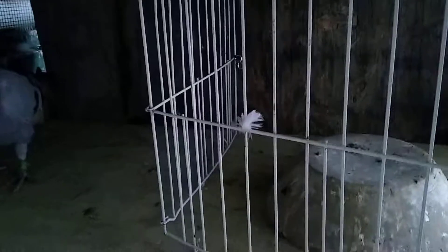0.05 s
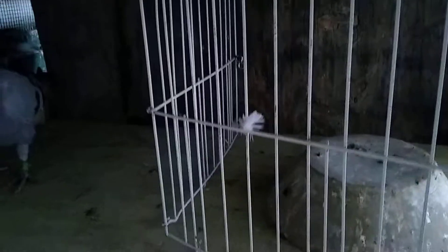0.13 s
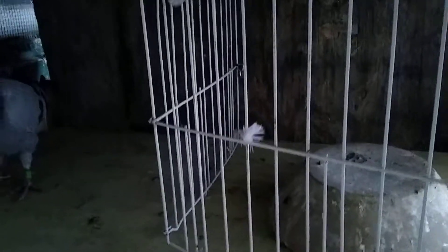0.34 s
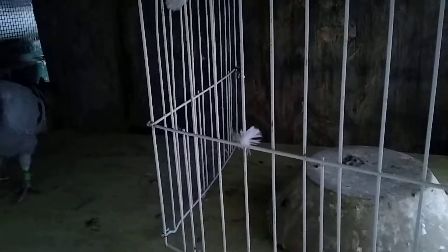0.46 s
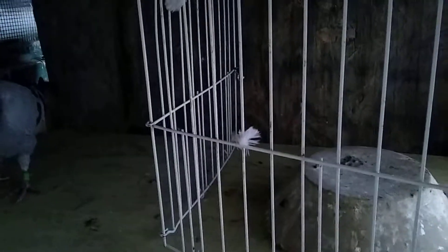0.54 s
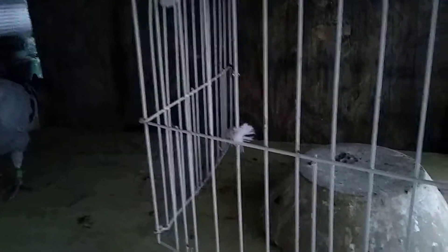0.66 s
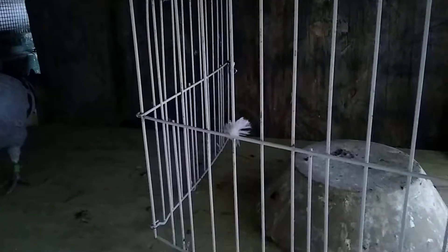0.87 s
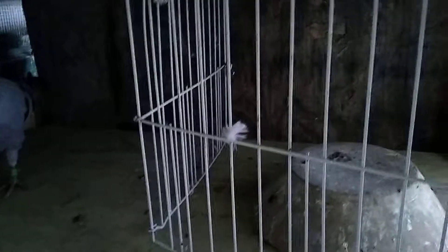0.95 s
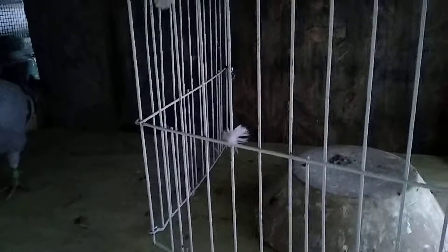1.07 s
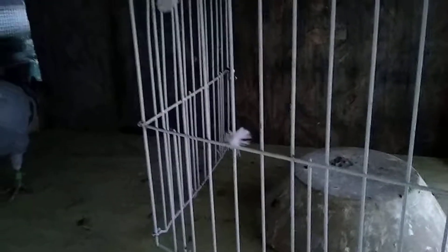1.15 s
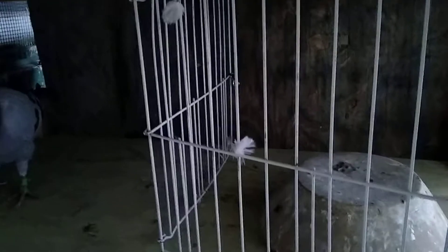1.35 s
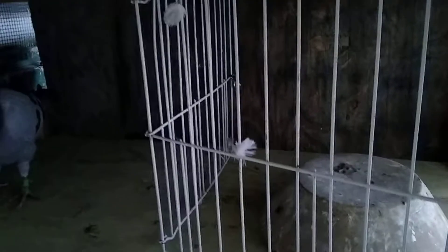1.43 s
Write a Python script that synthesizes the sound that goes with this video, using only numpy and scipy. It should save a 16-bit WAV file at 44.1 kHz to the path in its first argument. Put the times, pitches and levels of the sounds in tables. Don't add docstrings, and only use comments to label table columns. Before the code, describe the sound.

A nearby pigeon gives a short note, a long rolling coo and a closing note in a boxy wooden loft, while other birds murmur, rustle, flap and shuffle faintly; close stereo microphone with soft hiss.

```python
import sys
import numpy as np
from scipy import signal
from scipy.fft import rfft, irfft, next_fast_len
from scipy.io import wavfile
from scipy.ndimage import uniform_filter1d, map_coordinates

SR = 44100
rng = np.random.default_rng(int(sys.argv[2]) if len(sys.argv) > 2 else 0)


def store_wav(level_fs):
    pcm = np.round(np.clip(np.atleast_2d(level_fs), -1, 1) * 32767)
    wavfile.write(sys.argv[1], SR, pcm.T.astype(np.int16))


def gain_from_db(level_db):
    decades = np.asarray(level_db, float) / 20
    return 10 ** decades


N = 66150


def unit(x):
    return x / np.sqrt(np.mean(x ** 2) + 1e-20)


def along(points, hz):
    f, v = np.transpose(points)
    return np.interp(np.log(hz + 1), np.log(f + 1), v)


def curves(rows):
    s, *cols = np.transpose(rows)
    return [np.interp(np.arange(N) / SR, s, c) for c in cols]


def wobble(rate_hz):
    return map_coordinates(rng.standard_normal(400), [np.arange(N) * rate_hz / SR])


def filtered(x, response):
    m = next_fast_len(N + SR // 2)
    return irfft(rfft(x, m) * response(np.fft.rfftfreq(m, 1 / SR)), m)[..., :N]


def delay(hz, late_us):
    return np.exp(-2j * np.pi * hz * np.array(late_us)[:, None] / 10 ** 6)


# (frequency [Hz], correlation [-1..1])
PORT_LIKENESS = [(30, .9995), (80, .996), (160, 0.89), (300, 0.95), (500, 0.6), (900, 0.59), (2000, -0.23),
                 (10000, -0.46)]


def rush(spectrum, patchy_db):
    z = signal.stft(rng.standard_normal((2, N)), nperseg=512)[2]
    field = uniform_filter1d(rng.standard_normal(z.shape[1:]), size=6, axis=0)
    field = uniform_filter1d(field, size=8, axis=1)
    pair = signal.istft(z * gain_from_db(patchy_db * unit(field)), nperseg=512)[1][:, :N]

    def shape(hz):
        turn = np.arccos(np.clip(along(PORT_LIKENESS, hz), -1, 1)) / 2
        return gain_from_db(along(spectrum, hz)) * [np.cos(turn), np.sin(turn)]

    mid, side = filtered(pair, shape)
    return unit(np.array([mid + side, mid - side]))


BOX_HZ = [261, 295, 341, 380, 409, 451, 481, 503, 545, 588]
# (width [Hz], front level [dB], rear level [dB], front phase [turns], rear phase [turns])
BOX_MODES = [(12, -4, -2.5, 0, 0), (11, 6.5, 7, .12, .12), (14, -1, 0, 0, .03), (11, 0, .5, .25, .19),
             (12, 6, 6.5, .4, .44), (12, -2, -2, .2, .26), (11, 2, 1.5, .5, .44), (12, -5, -5.5, .3, .26),
             (22, -11, -10, .1, .14), (16, 0, -1, .4, .37)]


def boxes(f, tilt=0):
    total = 0
    for center, (width, front_db, rear_db, front_turn, rear_turn) in zip(BOX_HZ, BOX_MODES):
        gain = gain_from_db([[front_db], [rear_db]]) * (center / 400) ** tilt
        phase = np.exp(2j * np.pi * np.array([[front_turn], [rear_turn]]))
        mode = 1j * f * width / (center * center - f * f + 1j * f * width)
        total = total + gain * phase * mode
    return total


# (frequency [Hz], density [dB per Hz])
AIR_SPECTRUM = [(15, 3), (40, 8.5), (90, 7.5), (170, 0), (400, -0.5), (800, -16.5), (1700, -23),
                (3000, -43)]


def air():
    rumble = gain_from_db(-44) * rush(AIR_SPECTRUM, patchy_db=2.0)
    hiss = gain_from_db(-63.5) * rush([(500, 6), (5000, 2.0), (14000, -11.5)], patchy_db=5.5)
    return rumble + hiss


# (time [s], level [dB])
MURMUR_LEVEL = [(0, -39), (.07, -45), (.15, -45), (.8, -42), (1.17, -44), (1.3, -53.5), (1.44, -57.5),
                (1.5, -44)]


def murmur():
    voices = rush([(200, 27.8), (600, 0.5)], patchy_db=3.5)
    ringing = unit(filtered(voices, lambda hz: boxes(hz, tilt=2.62)))
    return ringing * gain_from_db(curves(MURMUR_LEVEL)[0] + wobble(9.76))


# (time [s], level [dB])
RUSTLE_LEVEL = [(0.0, -103), (0.178, -65.5), (0.32, -55.5), (0.53, -55.5), (0.646, -53), (0.792, -58.5),
                (1.048, -98.5), (1.26, -64.5), (1.386, -68.5), (1.5, -62)]
# (frequency [Hz], density [dB per Hz])
FEATHER_SPECTRUM = [(500, -41.5), (1200, 1), (2700, 2), (5000, 3.5), (9000, -1), (12000, -2.5),
                    (14500, -8.5)]


def rustle():
    return gain_from_db(curves(RUSTLE_LEVEL)[0] + 0.44 * wobble(13.0)) * rush(FEATHER_SPECTRUM, patchy_db=1.0)


# (time [s], level [dB])
SHUFFLE_LEVEL = [(1.08, -89), (1.16, -62), (1.27, -55), (1.39, -50), (1.44, -55), (1.5, -68)]
# (frequency [Hz], density [dB per Hz])
BOARD_SPECTRUM = [(300, -24.5), (550, -4), (800, 0.5), (1100, -5), (1600, -6), (2300, -2.5), (3200, -18),
                  (5000, -59)]


def feet():
    return gain_from_db(curves(SHUFFLE_LEVEL)[0] + 1.3 * wobble(20)) * rush(BOARD_SPECTRUM, patchy_db=1)


# (time [s], hold [s], level [dB])
WING_BEATS = [
    (0.127, 0.11, -57.5),
    (.512, 0.04, -49),
    (0.757, 0.013, -61),
    (1.031, 0.02, -64),
    (1.201, 0.018, -54.5),
    (1.335, .04, -55),
    (1.5, 0.09, -64.5),
]
# (frequency [Hz], density [dB per Hz])
WING_SPECTRUM = [(400, -28), (1000, 8), (2000, 6), (3500, 4), (7000, -3.5), (11000, -0.5), (14500, -17)]


def wings():
    rise_s, fall_s = 0.0046, 0.062
    t, beats = np.arange(N) / SR, np.zeros(N)
    for start, hold, db in WING_BEATS:
        rise = np.clip((t - start) / rise_s, 0, 1)
        fall = np.exp(-np.clip(t - start - hold, 0, None) / fall_s)
        beats += gain_from_db(db) * rise * fall
    return beats * gain_from_db(wobble(60)) * rush(WING_SPECTRUM, patchy_db=-1.0)


# (frequency [Hz], T60 [s])
LOFT_T60 = [(200, 0.23), (1000, 0.33), (8000, 0.036)]


def loft(x):
    hz, t, z = signal.stft(rng.standard_normal((2, SR // 2)), SR, nperseg=256)
    decay = gain_from_db(-60 * t / along(LOFT_T60, hz)[:, None])
    tail = signal.istft(z * decay, SR, nperseg=256)[1]
    return signal.fftconvolve(x[None], tail / np.linalg.norm(tail[0]), axes=1)[:, :N]


def crop(f):
    low_hz, high_hz = 250, 582
    low, high = low_hz / (f + 1), f / high_hz
    return 1 / (1 - low ** 2 - 1.2j * low) ** 2 / (1 - high ** 2 + .7j * high) ** 2


PUFF_TIMES = [.345, .365, .388, .41, .431, .452, .473, .493, .515, .545, .57, .589, .607, .626, .65, .674,
              .695, .712, .736, .756, .772, .79, .812, .836, .855, .879, .903, .922, .938, .958, .995,
              1.012, 1.04, 1.062, 1.08, 1.1, 1.128]


def throat():
    trill_hz, lead_s, scatter_db = 46.5, .004, 1.3
    rise = .125
    first, last = PUFF_TIMES[0], PUFF_TIMES[-1]
    before = np.arange(first - 20 / trill_hz, first - .01, 1 / trill_hz)
    after = last + np.arange(1, 21) / trill_hz
    starts = np.concatenate([before, PUFF_TIMES, after]) - lead_s
    beat = np.interp(np.arange(N) / SR, starts, np.arange(len(starts)))
    age = beat % 1 / rise
    sizes = gain_from_db(scatter_db * rng.standard_normal(200)) * (-1.) ** np.arange(200)
    return age * np.exp(1 - age), sizes[beat.astype(int)]


# (time [s], pitch [Hz], level [dB], trill depth [0-1])
GRUNT = [
    (.18, 239.7, -44.5, 0.24),
    (.205, 260.6, -33.5, 0.25),
    (.245, 281.4, -37, 0.5),
    (.28, 292, -75.5, .5),
]
# (time [s], pitch [Hz], level [dB], trill depth [0-1])
COO_NOTES = [
    [(.185, 390, -55, 0.7), (.2, 404.7, -27, 0.57), (.226, 403.9, -48, 0.75), (.27, 449.6, -46, 0.97),
     (.305, 456, -60, 0.8), (.325, 460, -79, .7)],
    [(.342, 379, -36.5, 0.4), (.362, 342.2, -26.5, 0.53), (.41, 317.9, -33.5, 0.57), (.6, 314.3, -32, 0.75),
     (.74, 333, -28, 0.47), (.8, 349, -27.5, 0.98), (.88, 323.8, -24, 0.59), (.968, 342.5, -30, 0.76),
     (.976, 350, -72, .8)],
    [(.995, 326.3, -53, 1), (1.012, 331.3, -17.5, 0.63), (1.045, 339.6, -33.5, 0.92),
     (1.07, 422.4, -31.5, 0.97), (1.11, 417.3, -37, 0.48), (1.14, 378, -59, 0.2), (1.16, 364, -73, 0.7)],
    [(1.455, 300, -66, .6), (1.485, 329, -41, 0.2), (1.5, 320, -50, .5)],
]


def pigeon():
    jitter_share, chirp_share, hoarse, octave_db = .012, .02, .27, -32
    t, out = np.arange(N) / SR, np.zeros(N)
    puff, size = throat()
    breath = unit(wobble(160))
    jitter = 1 + jitter_share * wobble(60) + chirp_share * (puff - puff.mean())
    for note in COO_NOTES + [GRUNT]:
        hz, db, depth = curves(note)
        phase = 2 * np.pi * np.cumsum(hz * jitter) / SR
        depth = np.clip(depth, 0, 1)
        gate = 1 - depth + 2 * depth * size * puff + hoarse * breath
        tone = np.sin(phase) + gain_from_db(octave_db) * np.sin(2 * phase)
        sounding = (t > note[0][0]) * (t <= note[-1][0])
        out += gain_from_db(db) * sounding * gate * tone
    return gain_from_db(2.5) * filtered(out, crop)


def scene():
    direct_db, box_db, loft_db, rear_late_us = -16, 0, -15, 77
    coo = pigeon()
    near = gain_from_db(direct_db) * coo + gain_from_db(box_db) * filtered(coo, boxes)
    near = filtered(near, lambda hz: delay(hz, (0, rear_late_us)))
    background = air()
    room = gain_from_db(loft_db) * loft(near[0])
    flock = rustle() + wings() + feet() + murmur()
    return near + room + flock + background


def band_limit(x):
    return signal.sosfilt(signal.butter(12, 14210, fs=SR, output="sos"), x)


# (frequency [Hz], level [dB])
REAR_PORT = [(50, 2.5), (300, 0.5), (1500, -5.5), (4000, -1.5), (9000, -2), (13000, -16)]


def record(dry):
    top_hz, preamp_db, makeup_db = 14250, -64, 1.7
    steer_us, steer_share = (424, 450), (.975, .975)

    def port_response(hz):
        return np.array([hz * 0 + 1, gain_from_db(along(REAR_PORT, hz))]) * (hz < top_hz)

    def steering(hz):
        return np.array(steer_share)[:, None] * delay(hz, steer_us)

    ports = filtered(dry, port_response)
    noise = rng.standard_normal((2, N))
    hiss = gain_from_db(preamp_db) * filtered(noise, lambda hz: hz ** 2 / (hz ** 2 + 4000 ** 2))
    opposite = filtered(ports[::-1], steering)
    mix = gain_from_db(makeup_db) * (ports - opposite + hiss)
    return band_limit(mix)


dry = scene()
out = record(dry)
store_wav(out)
```